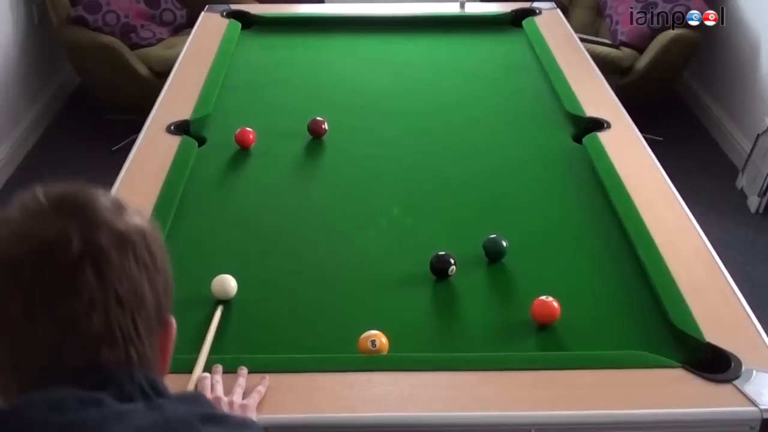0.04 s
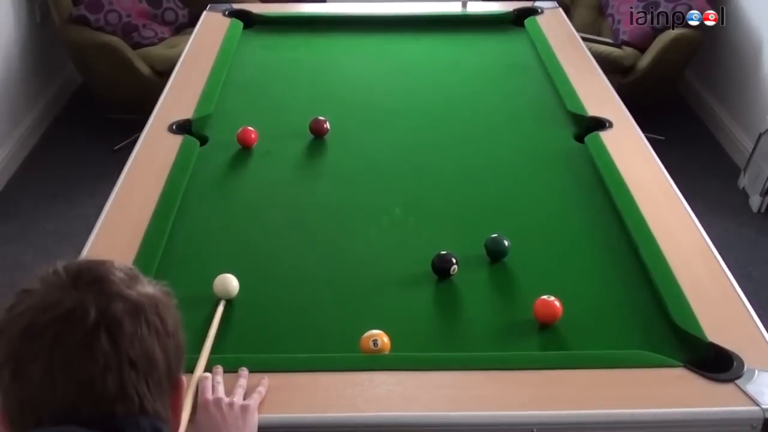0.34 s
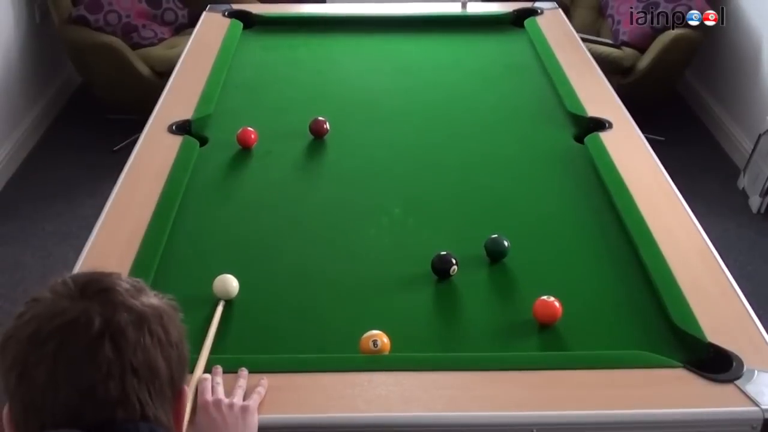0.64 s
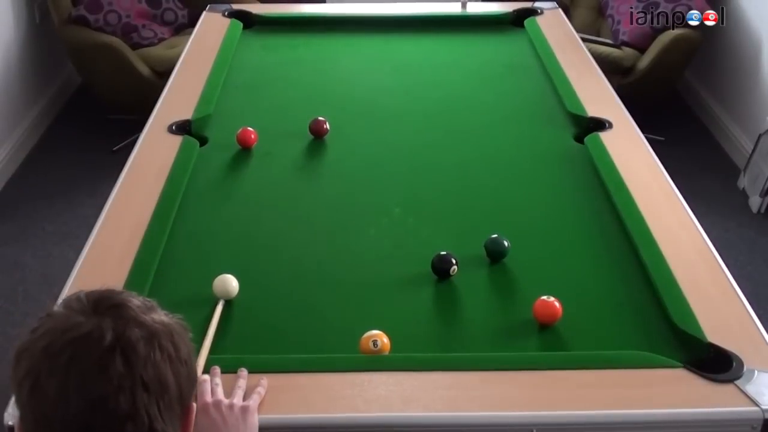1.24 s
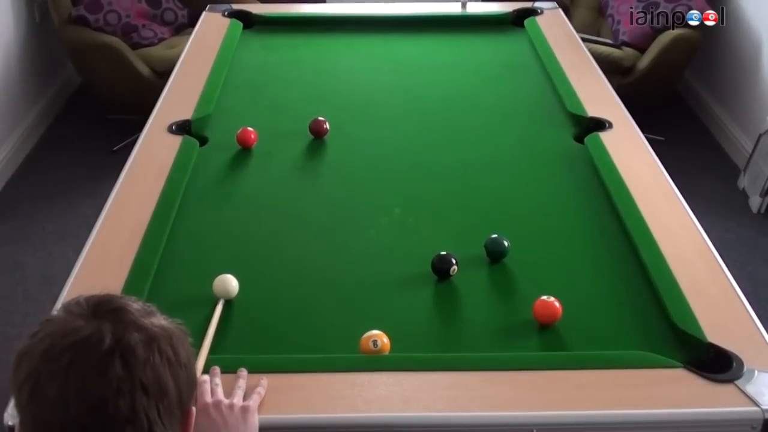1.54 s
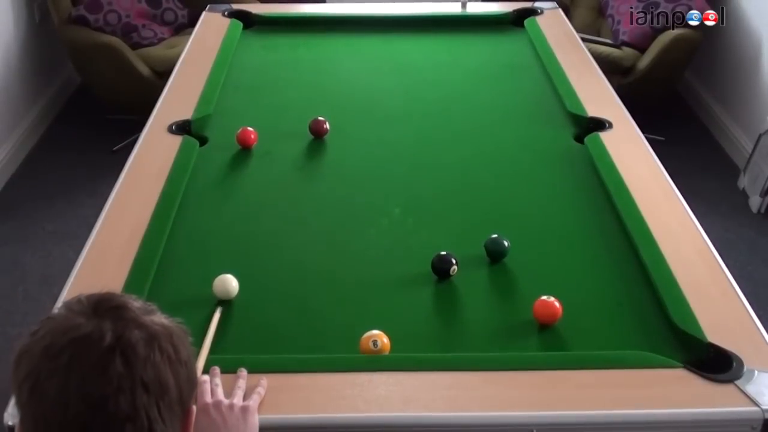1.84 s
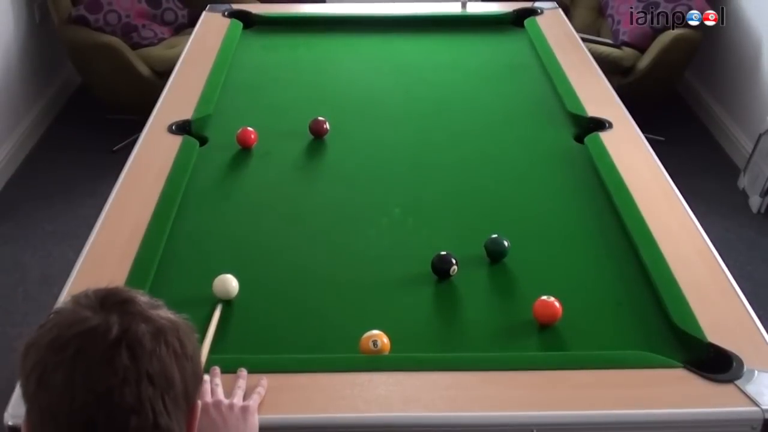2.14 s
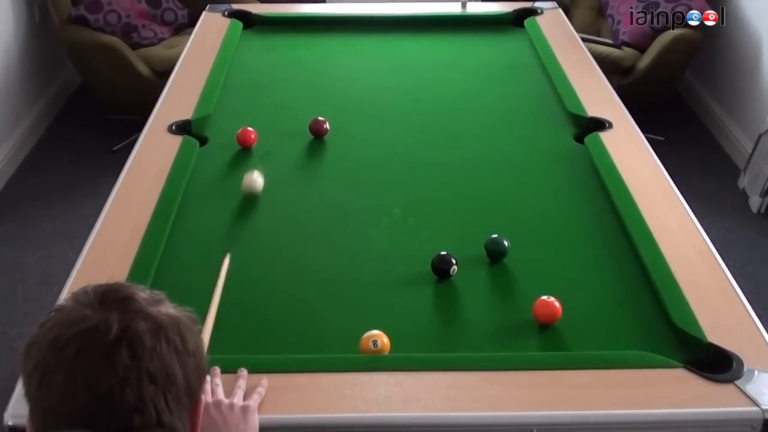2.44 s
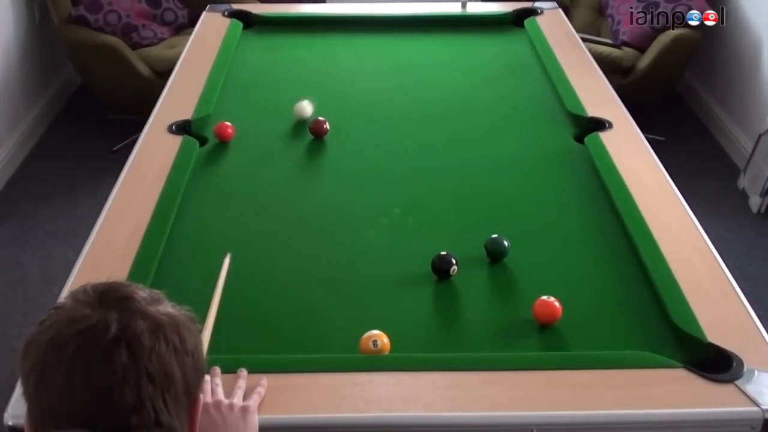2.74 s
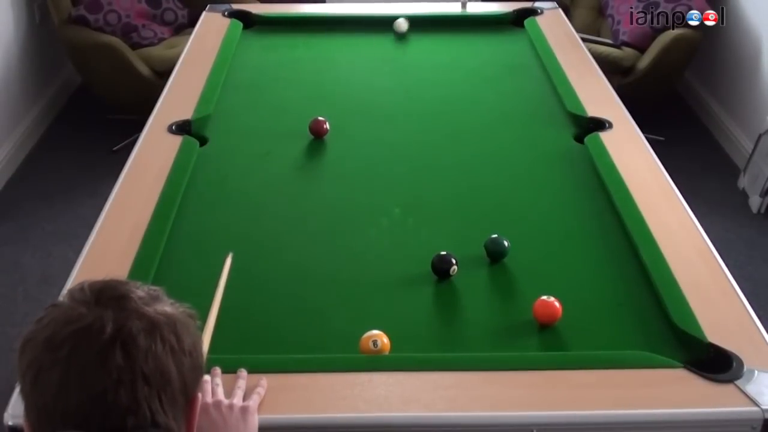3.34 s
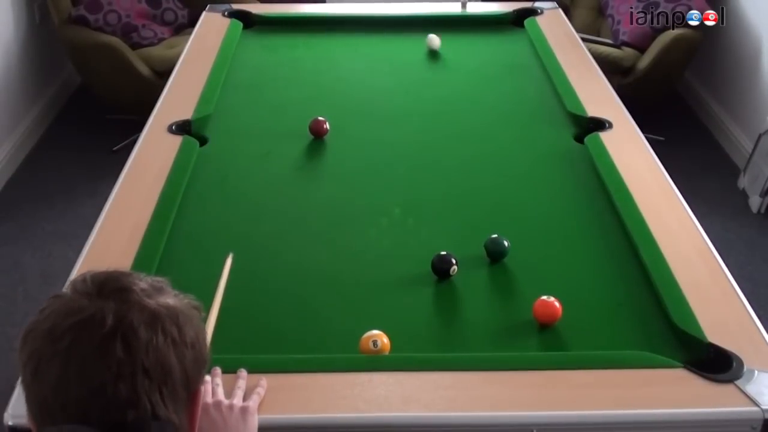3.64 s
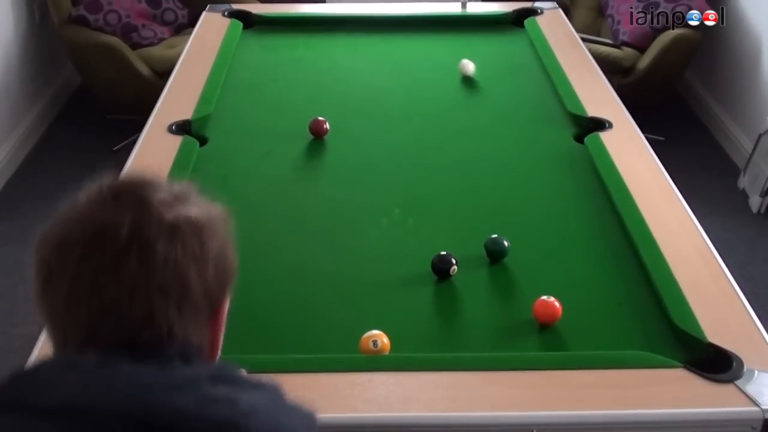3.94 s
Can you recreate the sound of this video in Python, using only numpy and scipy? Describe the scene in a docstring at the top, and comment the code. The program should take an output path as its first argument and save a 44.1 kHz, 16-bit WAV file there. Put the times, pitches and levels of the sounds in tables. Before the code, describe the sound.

A pool ball is pocketed, heard from just behind the player in a quiet room. After a soft rustle come the cue's knock, a sharp clack, a pocket thud, a cushion bump and a hollow clatter inside the table.

```python
"""A small, quiet room with a pool table: one shot, heard from behind the player.
Clothes rustle, the cue strikes, and the white ball clacks into a red. The red thuds into a pocket,
drops into the wooden gully (a channel inside the table) and rolls on until it clatters into the ball
tray; meanwhile the white bumps the far cushion. Knocks are filtered clicks with a short room echo,
ringing wood is a set of fading tones, and rolling and rustling are shaped noise."""
import sys
import numpy as np
from scipy import signal
from scipy.fft import rfft, irfft, next_fast_len
from scipy.io import wavfile

SR = 44100
rng = np.random.default_rng(int(sys.argv[2]) if len(sys.argv) > 2 else 0)


def bounce(signal):
    """Save signal as a 16-bit WAV file at the path given by the first command-line argument."""
    frames = np.transpose(np.atleast_2d(signal))
    limited = np.clip(frames, -1, 1)
    pcm = np.round(limited * 32767).astype(np.int16)
    wavfile.write(sys.argv[1], SR, pcm)


N = 176400
TIME = np.arange(N) / SR

# Each time two things touch: (time [s], relative level [dB], treble fades above [Hz])
CUE_CONTACTS = [(2.2843, -7, 2530), (2.2860, 0, 15000)]
POCKET_CONTACTS = [(3.022, -5.5, 800), (3.037, -3.5, 1610), (3.064, -10.5, 1500)]
GULLY_CONTACTS = [(3.2243, 1.5, 12000), (3.231, 0, 2000), (3.245, 4, 466), (3.273, -5, 560),
                  (3.366, -13.5, 6000)]
TRAY_CONTACTS = [(3.6738, -2.5, 15000), (3.679, -11, 9000), (3.695, -6, 3980), (3.708, -0.5, 2720),
                 (3.720, -7.5, 3000), (3.744, -1.5, 2060), (3.773, -4.5, 1870), (3.811, -6, 920),
                 (3.850, 0, 131), (3.955, -20, 510)]
CUSHION_CONTACTS = [(3.475, -13, 8000), (3.486, -9.5, 7000), (3.494, 3, 900), (3.515, -6.5, 1600)]
HAND_CONTACTS = [(0.02, -4, 5000), (0.240, 1, 684)]
TICK_CONTACTS = [(0.1742, 0, 12000)]
# The colour (mix of bass and treble) of each kind of knock: (frequency [Hz], gain [dB])
CUE_COLOUR = [(40, -30), (68, -17), (150, -9), (250, 0.5), (330, 11), (850, 8), (1150, 5.5), (1800, 7),
              (3000, -8.5), (4500, -15), (7000, -12), (10000, -25), (13000, -44)]
SNAP_COLOUR = [(2000, -42), (5000, -31), (8500, -15), (10500, -21), (14500, -49)]
CLACK_COLOUR = [(100, -42), (450, -14), (1000, 1), (2100, 10), (3000, 8.5), (3800, -2), (4700, -22),
                (5800, -15), (7500, -24), (15000, -24)]
POCKET_COLOUR = [(40, -12), (68, 5), (170, 7.5), (350, 19.5), (520, 5), (720, 3.5), (1000, -8), (1600, -16),
                 (4000, -14), (12000, -31)]
GULLY_COLOUR = [(45, -15), (68, 8), (130, 4), (380, 11.5), (600, 5.5), (900, 3), (1350, 2.5), (2000, -3),
                (4000, -14.5), (6500, -16.5), (9500, -29.5), (15000, -47)]
TRAY_COLOUR = [(35, -3), (70, 11.5), (120, 17), (270, 15), (430, 18.5), (750, 16), (1250, 8.5), (2500, 10),
               (4500, 3), (7000, 5), (10000, -8), (12500, -15.5), (15000, -29)]
CUSHION_COLOUR = [(45, -19), (66, 10), (105, 12.5), (220, 8.5), (330, 12), (480, -4.5), (780, -5),
                  (1400, -13), (4000, -16.5), (12000, -19)]
HAND_COLOUR = [(60, -25), (150, -21), (250, 0), (420, -18), (900, -15), (3000, -26), (10000, -30)]
TICK_COLOUR = [(200, -34), (650, -13), (1200, -24), (2700, -19.5), (3400, -11.5), (4300, -26.5),
               (7000, -18), (10500, -29), (14000, -46)]
# Tones that ring on after a knock: (frequency [Hz], relative level [dB], time to fade by 60 dB [s])
CUE_TONES = [(329, -42.5, 0.46), (385, -46.5, 0.45), (530, -43, .25), (657, -42, 0.27), (778, -38, 0.22),
             (848, -41, .27), (1040, -53, 0.26), (1525, -32, 0.13), (2056, -39, 0.061), (2466, -50, 0.17)]
POCKET_TONES = [(235, -50, 0.69), (286, -48, 0.23), (352, -33.5, 0.16), (413, -41, 0.2), (606, -45.5, .35)]
GULLY_TONES = [(178.5, -26.5, 0.26), (279.7, -32.5, 0.42), (337, -29.5, .36), (408.2, -22.5, .26)]
LANDING_TONES = [(1077, -45, 0.27), (1195, -38, 0.21), (1236, -38, 0.12), (1540, -43, .16),
                 (1950, -55, 0.23)]  # the hard first landing in the gully
TRAY_TONES = [(106, -34, 0.51), (136.3, -23.5, 0.43), (223, -24.5, 0.46), (281.4, -30, 0.52),
              (364, -24, 0.47), (408.3, -17, 0.26), (550, -43, 0.25), (674, -22.5, .35), (692, -28.5, 0.49),
              (775, -42, 0.24), (864, -35, 0.49), (1464, -35, .3), (1633, -33.5, 0.27), (1876, -30.5, 0.28),
              (2360, -47, 0.33)]
CUSHION_TONES = [(102.5, -23, 0.075), (110.6, -34.5, 0.22), (181, -42, 0.25), (261, -38, 0.29),
                 (303.8, -37.5, .3)]
# Hard surfaces nearby throw the clack back: (delay [s], relative level [dB], left minus right [dB])
NEAR_ECHOES = [(.0011, -6, -5), (.002, -17, 2), (.00555, 3.5, -3), (.0066, -6, -8)]
# How each noise swells and sinks: (time [s], level [dB])
CHALK_LEVELS = [(2.287, -44.5), (2.290, -44), (2.294, -66), (2.32, -110)]
GULLY_ROLL_LEVELS = [(3.25, -65), (3.3, -48), (3.42, -45.5), (3.46, -53), (3.66, -66.5), (3.8, -37.5),
                     (4.0, -54)]
CLOTH_ROLL_LEVELS = [(2.28, -88), (2.33, -53.5), (2.45, -59), (2.55, -79), (3.0, -78), (4.0, -85)]
CLOTHES_LEVELS = [(0, -67), (.15, -66), (.27, -65.5), (.36, -71), (.6, -78)]
HISS_LEVELS = [(0, -88), (.65, -84), (1.05, -75.5), (1.3, -88), (1.65, -78.5), (2.0, -78), (2.2, -87),
               (2.95, -78), (4.0, -82)]
# The colour of those noises and of the room's air: (frequency [Hz], relative level [dB])
CHALK_RASP_COLOUR = [(2500, -20), (5200, -4), (7000, -2), (11000, -28)]
GULLY_ROLL_COLOUR = [(40, -39), (75, -25), (130, -19), (183, -1), (230, -8.5), (340, 2), (500, -17.5),
                     (750, -19), (1500, -28.5), (6000, -51)]
CLOTH_ROLL_COLOUR = [(40, -24), (70, -2), (200, -2), (350, -2), (700, -26), (3000, -44)]
CLOTHES_COLOUR = [(35, -17), (80, 3.5), (160, -3), (400, -5), (2000, -10), (8000, -15.5), (13000, -28)]
THIN_HISS_COLOUR = [(3000, -35), (4300, -12), (4560, 5.5), (4780, -3), (5100, -6), (7000, -29)]
AIR_COLOUR = [(30, -26), (130, -8.5), (210, -6.5), (258, -2), (350, -5), (560, -6.5), (720, -3),
              (870, -4.5), (1130, -6.5), (1600, -10.5), (3000, -16.5), (6200, -18.5), (7400, -17.5),
              (9000, -20), (15500, -21)]
# Faint steady hum in the room: (frequency [Hz], level [dB])
HUM_TONES = [(258.4, -76), (317.6, -82.5), (726.7, -79.5), (1120, -79)]
# How long the echo tail after each knock lasts; in the deep bass the table's body keeps it going: (frequency
# [Hz], time to fade by 60 dB [s])
TAIL_FADE = [(70, 0.84), (160, 0.31), (400, .42), (1000, 0.32), (2500, 0.26), (7000, 0.3), (14000, 0.087)]
# How much the two ears differ: (frequency [Hz], gain of the part that differs [dB])
STEREO_WIDTH = [(100, -23), (300, -17.5), (600, -12.5), (1500, -10.5), (5000, -11.5), (8000, -14.5),
                (11000, -31)]


def cue_strike(pan_db=0.5):
    """The tip snaps against the white, its chalk rasps and the shaft rings."""
    strike_s = CUE_CONTACTS[-1][0]
    snap = np.zeros((2, N))
    add(snap, strike_s, np.ones((2, 1)))
    chalk = shaped_noise(CHALK_RASP_COLOUR, level_curve(CHALK_LEVELS))
    knock = knocks(CUE_CONTACTS, CUE_COLOUR, click_db=-9.5, shake_db=2, shake_s=0.084, pan_db=pan_db)
    shaft = ringing(strike_s, CUE_TONES, swell_s=0.0037, pan_db=pan_db)
    return knock + coloured(snap, SNAP_COLOUR) + chalk + shaft


def ball_clack(start_s=2.6786, click_db=-10, room_db=-1):
    """The white meets the red in one very short click; its echoes come back duller."""
    click, echoes = np.zeros((2, 2, N))
    add(click, start_s, from_db(click_db) * np.ones((2, 1)))
    add(echoes, start_s, from_db(room_db) * room_echo() * pan(db=-0.5))
    for delay_s, db, pan_db in NEAR_ECHOES:
        add(echoes, start_s + delay_s, from_db(click_db + db) * pan(pan_db))
    return coloured(click + dulled(echoes, above_hz=5900), CLACK_COLOUR)


def pocket_thud():
    """The red thuds against the padded pocket, which rings briefly."""
    thud = knocks(POCKET_CONTACTS, POCKET_COLOUR, click_db=-9.5, shake_db=-5, shake_s=0.069, pan_db=-1)
    return thud + ringing(POCKET_CONTACTS[0][0], POCKET_TONES, swell_s=0.004, pan_db=-1)


def gully_drop():
    """The red lands in the wooden channel, bounces and rolls."""
    landing_s = GULLY_CONTACTS[0][0]
    bounces = knocks(GULLY_CONTACTS, GULLY_COLOUR, click_db=-12, shake_db=-2, shake_s=0.13, pan_db=-1)
    wood = ringing(landing_s, GULLY_TONES, swell_s=0.026, pan_db=-1.5)
    landing = ringing(landing_s, LANDING_TONES, swell_s=0.00061, pan_db=0)
    roll = shaped_noise(GULLY_ROLL_COLOUR, level_curve(GULLY_ROLL_LEVELS)) * pan(db=-1.5)
    return bounces + wood + landing + roll


def tray_clatter():
    """The red clatters into the tray and the hollow cabinet booms."""
    clatter = knocks(TRAY_CONTACTS, TRAY_COLOUR, click_db=-7, shake_db=-2.5, shake_s=0.083, pan_db=-0.7)
    return clatter + ringing(TRAY_CONTACTS[0][0], TRAY_TONES, swell_s=0.058, pan_db=-5.5)


def cushion_bump():
    """The white rolls up the cloth and bounces off the far rubber cushion."""
    roll = shaped_noise(CLOTH_ROLL_COLOUR, level_curve(CLOTH_ROLL_LEVELS))
    bump = knocks(CUSHION_CONTACTS, CUSHION_COLOUR, click_db=-11, shake_db=-1.5, shake_s=0.13, pan_db=-1)
    return roll + bump + ringing(CUSHION_CONTACTS[2][0], CUSHION_TONES, swell_s=0.016, pan_db=-2.5)


def player_settling():
    """Clothes rustle as the player bends down, a hand taps the table's edge and the cue ticks."""
    clothes = shaped_noise(CLOTHES_COLOUR, level_curve(CLOTHES_LEVELS))
    hand = knocks(HAND_CONTACTS, HAND_COLOUR, click_db=4.5, shake_db=11, shake_s=0.096, pan_db=-2)
    tick = knocks(TICK_CONTACTS, TICK_COLOUR, click_db=2, shake_db=7, shake_s=0.021, pan_db=2)
    return clothes + hand + tick


def room_echo(bands=18, build_s=0.0031, spread_s=0.004):
    """Countless echoes blur into noise; each band of pitch fades at its own rate."""
    t, hz = TIME[:SR], np.fft.rfftfreq(SR, 1 / SR)
    spread = 1 - np.exp(-t / spread_s)  # early echoes come from the front, later ones from all round
    spectrum = rfft(stereo_noise(SR, spread))
    build_up = 1 - np.exp(-t / build_s)
    centres_hz, out = np.geomspace(50, 16000, bands), 0
    for centre_hz, this_band_only in zip(centres_hz, np.eye(bands)):
        window = np.interp(hz, centres_hz, this_band_only)
        fade = from_db(-60 * t / at_hz(TAIL_FADE, centre_hz))
        band = irfft(spectrum * window) * fade * build_up
        # A band's energy depends on its width, not on how long it lasts.
        out = out + band * np.sqrt(2 * np.mean(window ** 2) / np.sum(band ** 2))
    return out


def room_background(wider_db=5.5):
    """Soft air noise, a faint hum and a thin, high hiss that swells and sinks."""
    hum = 0
    for hz, db in HUM_TONES:
        hum = hum + from_db(db) * np.sqrt(2) * np.sin(2 * np.pi * (hz * TIME + rng.random()))
    air = shaped_noise(AIR_COLOUR, db=-65.5, wider_db=wider_db)
    hiss = shaped_noise(THIN_HISS_COLOUR, level_curve(HISS_LEVELS), wider_db)
    return air + hiss + hum


def knocks(contacts, colour, click_db, shake_db, shake_s, pan_db):
    """Each contact is a sharp click, a brief shake of the thing struck and the room's echo."""
    out, t = np.zeros((2, N)), TIME[:SR]
    click_gain, shake_gain = from_db(click_db), from_db(shake_db)  # compared with the echo
    for start_s, db, treble_hz in contacts:
        shake = rng.standard_normal(SR) * from_db(-60 * t / shake_s)
        sound = room_echo() + shake_gain * shake / np.linalg.norm(shake)
        sound[:, 0] += click_gain
        sound /= np.sqrt(1 + shake_gain ** 2 + click_gain ** 2)  # same energy whatever the blend
        add(out, start_s, from_db(db) * dulled(sound, treble_hz))
    return coloured(out, colour) * pan(pan_db)


def ringing(start_s, tones, swell_s, pan_db):
    """Tones swell as a knock spreads through the wood, then die away."""
    out, t = np.zeros((2, N)), TIME[:SR]
    for hz, db, fade_s in tones:
        loudness = from_db(db - 60 * t / fade_s) * (1 - np.exp(-t / swell_s))
        add(out, start_s, loudness * np.sin(2 * np.pi * (hz * t + rng.random())))
    return out * pan(pan_db)


def shaped_noise(colour, db, wider_db=0):
    """Noise with a given colour and a steady or changing level."""
    noise = coloured(stereo_noise(N, from_db(wider_db)), colour)
    return from_db(db) * noise / noise.std()


def stereo_noise(size, spread):
    """White noise, most alike in both ears in the bass and at the very top."""
    shared, side = rng.standard_normal((2, size))
    width = from_db(at_hz(STEREO_WIDTH, np.fft.rfftfreq(size, 1 / SR)))
    side = irfft(rfft(side) * width, size)
    return shared + spread * side * np.array([[1], [-1]])


def coloured(sound, colour):
    """Give a sound its mix of bass and treble (a minimum-phase filter)."""
    size = next_fast_len(2 * sound.shape[-1], real=True) // 2 * 2
    gains = from_db(at_hz(colour, np.fft.rfftfreq(size, 1 / SR)))
    cepstrum = irfft(np.log(gains))
    # Fold the filter forward in time, so nothing rings before the knock.
    cepstrum[1:size // 2] *= 2
    cepstrum[size // 2 + 1:] = 0
    response = np.exp(rfft(cepstrum))
    return irfft(rfft(sound, size) * response, size)[..., :sound.shape[-1]]


def dulled(sound, above_hz):
    """Gently turn down the treble."""
    return signal.sosfilt(signal.butter(2, above_hz, fs=SR, output="sos"), sound)


def level_curve(points):
    """Join (time, level) points with lines; silent before the first."""
    return np.interp(TIME, *np.transpose(points), left=-np.inf)


def at_hz(points, hz):
    """Read a table between its frequencies, with octaves evenly spaced."""
    table_hz, values = np.transpose(points)
    return np.interp(np.log(hz + 1e-3), np.log(table_hz), values)


def from_db(db):
    """Turn decibels into a multiplier."""
    return 10 ** (np.asarray(db) / 20)


def pan(db):
    """Left and right gains; above 0 dB leans left."""
    return from_db(np.array([[.5], [-.5]]) * db)


def add(out, start_s, sound):
    """Mix a sound in at a given time."""
    start = int(start_s * SR)
    out[:, start:start + sound.shape[-1]] += sound[..., :N - start]


def scene():
    """The whole shot over the quiet room."""
    return (room_background() + player_settling() + cue_strike() + ball_clack()
            + pocket_thud() + gully_drop() + cushion_bump() + tray_clatter())


def record(dry):
    """Steeply cut the very highest treble."""
    cutoff_hz = 15900
    return signal.sosfilt(signal.ellip(10, .1, 70, cutoff_hz, fs=SR, output="sos"), dry)


dry = scene()
out = record(dry)
bounce(out)
```